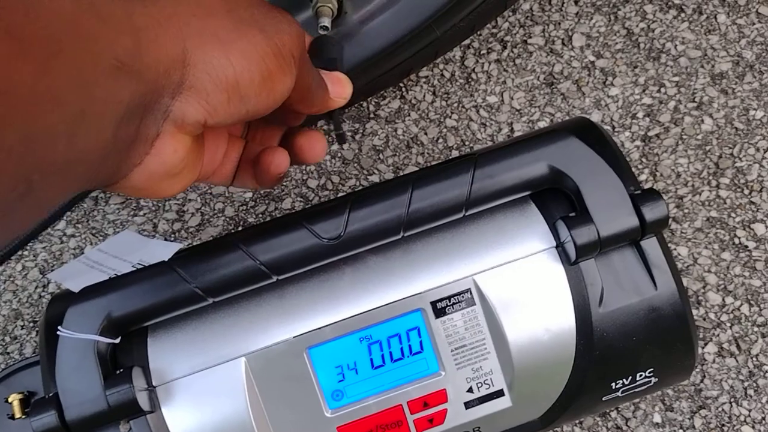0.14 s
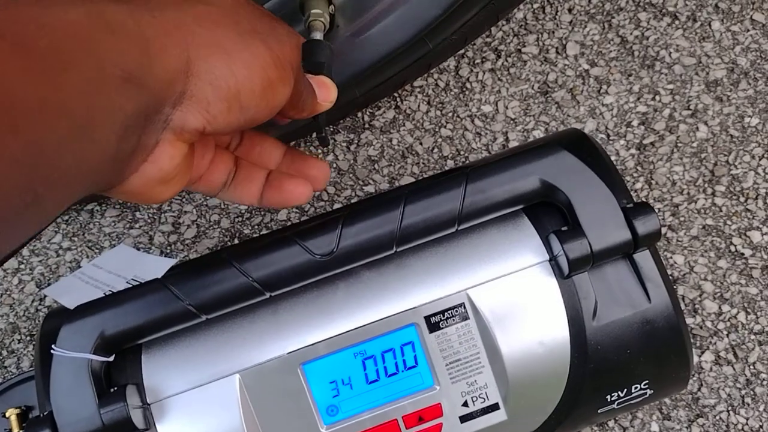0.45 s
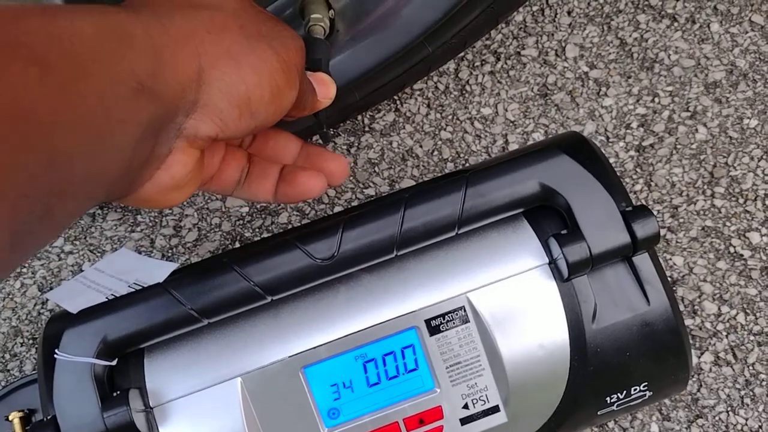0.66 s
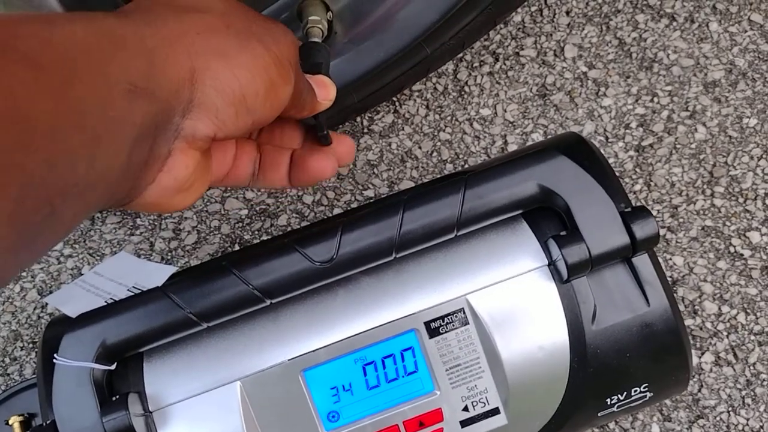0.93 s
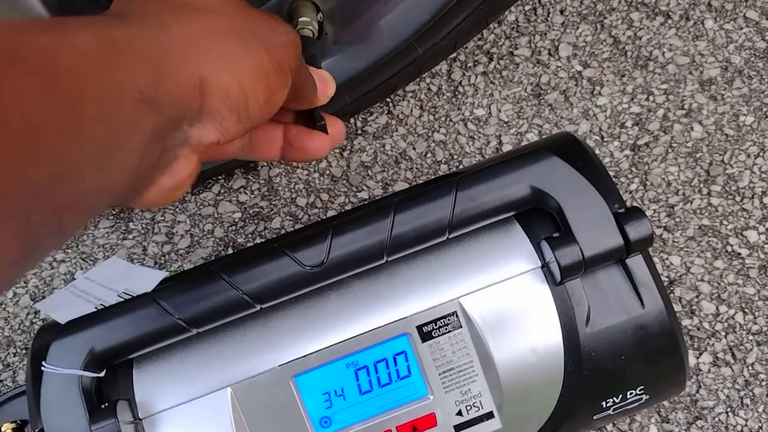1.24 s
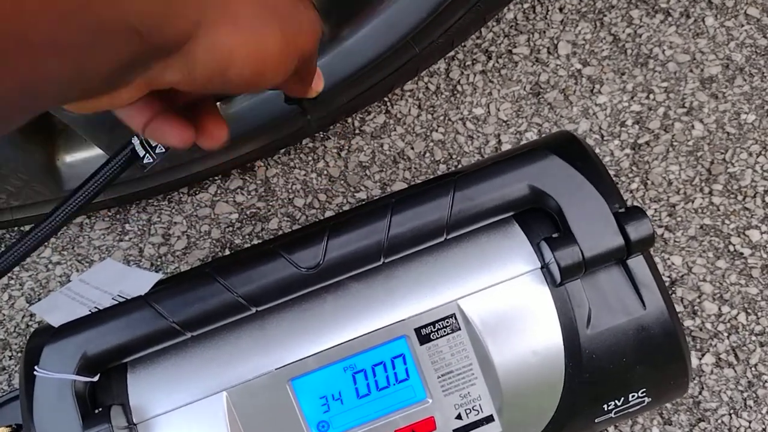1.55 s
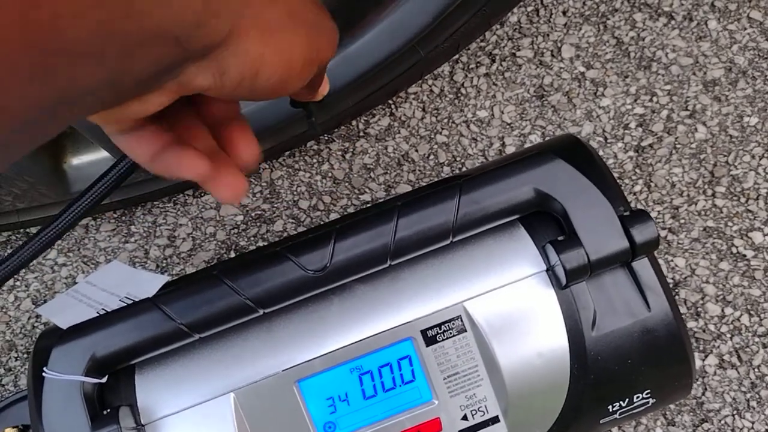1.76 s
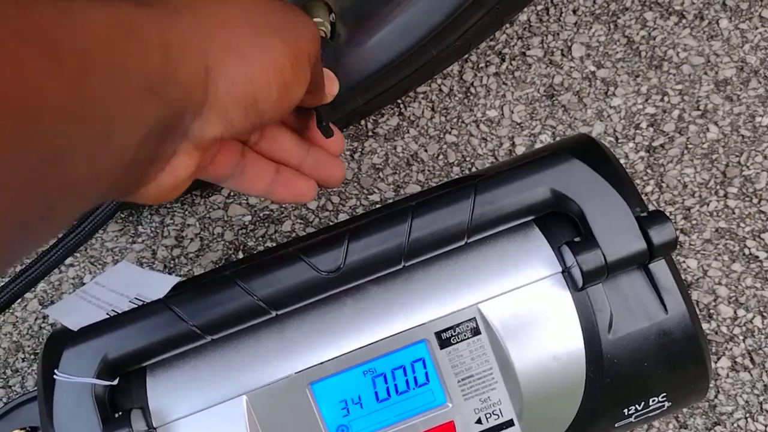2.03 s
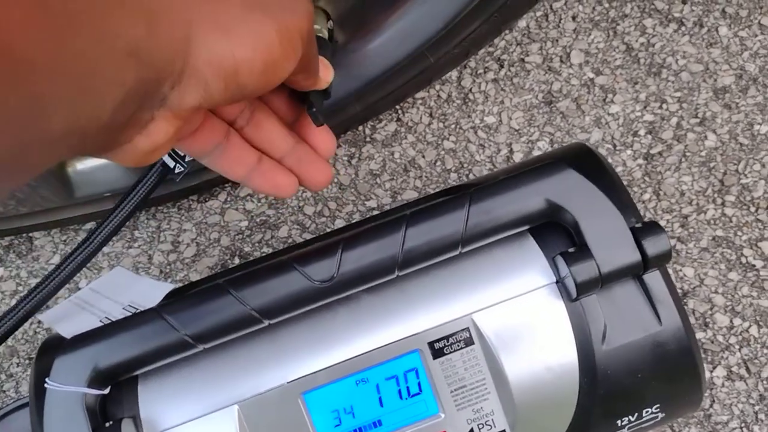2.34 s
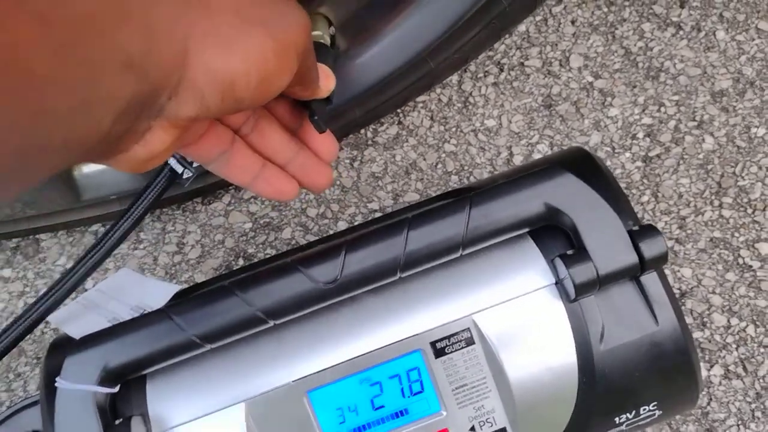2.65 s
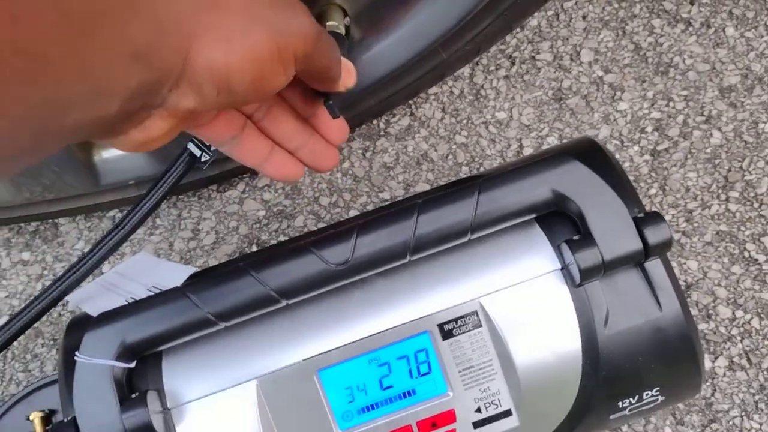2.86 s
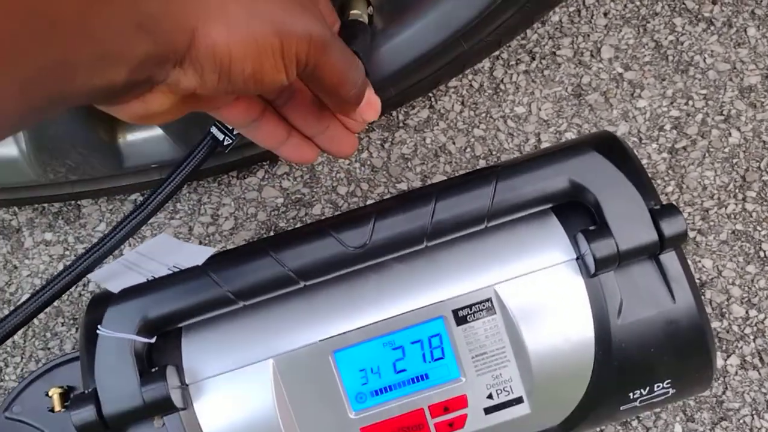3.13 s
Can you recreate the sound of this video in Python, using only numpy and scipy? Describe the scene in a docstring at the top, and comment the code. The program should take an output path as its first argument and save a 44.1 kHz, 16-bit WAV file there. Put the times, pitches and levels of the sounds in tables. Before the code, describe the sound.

A loud, bright air hiss escapes at a tire valve after about two seconds of low throbbing engine idle and soft mechanical rush, outdoors on pavement, close mono microphone; it continues to the end.

```python
"""Beside an idling eight-cylinder engine, at a tire valve, with a mono recorder close by.
Behind: faint wavering sines, a treble rustle in swells and the rush of the engine bay (both coloured noise),
and a throbbing exhaust hum made of uneven firing pulses sent through a pipe response.
In front, an air chuck is screwed onto the valve; the pin opens and air hisses out past the thread
as resonant noise. The recorder turns its gain down under the hiss."""
import sys
import numpy as np
from scipy import signal
from scipy.fft import rfft, irfft, next_fast_len
from scipy.io import wavfile
from scipy.ndimage import uniform_filter1d

SR = 44100
rng = np.random.default_rng(int(sys.argv[2]) if len(sys.argv) > 2 else 0)


def master_out(mix):
    """Clip the mix to full scale and print it as 16-bit PCM to the path in sys.argv[1]."""
    frames = np.transpose(np.atleast_2d(mix))
    ceiling = np.clip(frames, -1, 1)
    pcm = np.round(ceiling * 32767).astype(np.int16)
    wavfile.write(sys.argv[1], SR, pcm)


N = 145530  # samples


def amp(db):
    """Amplitude factor of a level in dB."""
    return 10 ** (np.asarray(db) / 20)


def rms_one(x):
    """Scale a signal to rms 1."""
    return x / np.sqrt(np.mean(x ** 2) + 1e-20)


def at_hz(points, hz):
    """Read a (hz, db) curve, straight over log frequency."""
    curve_hz, curve_db = np.transpose(points)
    return np.interp(np.log(hz), np.log(curve_hz), curve_db)


def drift(rate_hz):
    """Slow random wander of spread 1: white noise smoothed by two equal poles."""
    pole = np.exp(-80 * np.pi * rate_hz / SR)  # runs at one value per 40 samples
    noise = rng.standard_normal(N // 40 + 2002)
    slow = signal.lfilter([1], [1, -2 * pole, pole * pole], noise)[2000:]
    return np.interp(np.arange(N) / 40, np.arange(len(slow)), rms_one(slow))


def noise_bands(spectrum, peaks):
    """Noise coloured by a spectrum and resonances, rms 1, as overlapping third-octave (centre Hz, band)."""
    size = next_fast_len(N)
    hz = np.arange(size // 2 + 1) * SR / size + 1e-3
    db = at_hz(spectrum, hz)
    for peak_hz, width_hz, lift_db in peaks:
        db = db + lift_db * np.exp(-(1.5 * (hz - peak_hz) / width_hz) ** 2)
    shaped = rfft(rng.standard_normal(size)) * amp(db) * (hz > 20) * (hz < 9000)
    shaped = shaped / np.std(irfft(shaped, size))
    centres = 250 * 2 ** (np.arange(17) / 3)
    place = np.interp(np.log(hz), np.log(centres), np.arange(17))
    bands = []
    for k, centre in enumerate(centres):
        share = np.maximum(0, 1 - abs(place - k))  # neighbours crossfade and sum to one
        bands.append((centre, irfft(shaped * share, size)[:N]))
    return bands


# Faint steady tones behind everything: 45.6 Hz is an engine order (three times crank speed),
# the rest perhaps belt-driven parts: pitch_hz, mean level_db (rms)
WHINE_TONES = [(45.6, -60), (268.8, -60), (311.8, -61), (394.7, -65), (546, -66), (668.5, -65), (698, -66),
               (822, -61), (879, -65), (897.8, -59), (936.6, -66), (957, -68), (1013.5, -66), (2375, -67),
               (2873, -59), (3275, -68), (3515, -67)]
WHINE_WAVER_DB, WHINE_WANDER = 2.0, .0006  # spreads: level in dB, pitch as a fraction


def whines():
    """Thin sine tones, each wavering in level and pitch on its own."""
    total = np.zeros(N)
    for pitch_hz, level_db in WHINE_TONES:
        level = np.sqrt(2) * amp(level_db + WHINE_WAVER_DB * drift(2.44))
        start_phase = rng.uniform(0, 2 * np.pi)
        cycles = pitch_hz * np.cumsum(1 + WHINE_WANDER * drift(4.9)) / SR
        total += level * np.sin(start_phase + 2 * np.pi * cycles)
    return total


# Swells of a treble rustle, perhaps insects: time_s, level_db before the flicker
RUSTLE_LEVEL = [(0, -60), (.12, -51), (.2, -57.5), (.265, -50.5), (.28, -61), (.4, -58), (.5, -56),
                (.6, -63), (.7, -51.5), (.84, -56.5), (.87, -66), (.96, -54), (1.02, -55.5), (1.1, -57.5),
                (1.2, -65), (1.27, -57), (1.31, -60), (1.39, -51), (1.41, -62), (1.56, -62), (1.67, -50),
                (1.69, -61.5), (1.82, -60.5), (2.2, -63.5)]
# Colour of the rustle above its low-end floor: frequency_hz, relative level_db (per Hz)
RUSTLE_SPECTRUM = [(4400, -25.5), (5000, -7), (6300, -11), (7500, -12), (8000, -38)]
# Resonances in the rustle: frequency_hz, width_hz, lift_db
RUSTLE_PEAKS = [(5280, 220, 4.5), (5540, 170, 9.5), (5850, 40, 12), (7030, 460, 5.5)]
TREBLE_FLICKER_DB = 2.5


def treble_swells():
    """A faint narrow noise that repeatedly swells and falls, flickering as it goes."""
    level_db = np.interp(np.arange(N) / SR, *np.transpose(RUSTLE_LEVEL))
    level_db = level_db + TREBLE_FLICKER_DB * drift(25.0)
    bands = noise_bands([(3000, -61)] + RUSTLE_SPECTRUM, RUSTLE_PEAKS)
    return amp(level_db) * sum(band for _, band in bands)


# Rush of the engine bay: frequency_hz, relative level_db (per Hz)
BAY_SPECTRUM = [(30, -34.5), (60, -7.5), (150, -2), (300, -4), (450, -10.5), (950, -14), (1150, -16),
                (1700, -20.5), (2200, -13), (3600, -13.5), (4100, -23), (5400, -25.5), (6500, -26.5),
                (7600, -26), (8100, -50)]
# Resonances of the engine bay: frequency_hz, width_hz, lift_db
BAY_RESONANCES = [(535.5, 82, 5.5), (867, 260, 7.5), (1336, 49, 6), (2200, 120, 2.5), (2377, 94, 8.5),
                  (2510, 45, 5.5), (2590, 68, -0.5), (2897, 180, 12.5), (3266, 90, 4.5), (3526, 110, 5.5),
                  (5300, 460, 4.5)]
BAY_DB, BAY_PATCHY_DB = -42.5, 0.8  # level before patchiness and rise; spread of each band
RASP_HZ, RASP_RISE_DB_PER_S = 2880, 0.26  # bands within a quarter octave grow slowly


def engine_bay():
    """Resonant noise whose bands waver separately while a rasp near the middle treble grows."""
    t = np.arange(N) / SR
    total = np.zeros(N)
    for hz, band in noise_bands(BAY_SPECTRUM, BAY_RESONANCES):
        is_rasp = abs(np.log2(hz / RASP_HZ)) < 1 / 4
        rise_db = RASP_RISE_DB_PER_S * (t + 0.5) * is_rasp
        total += band * amp(BAY_PATCHY_DB * drift(5.9) + rise_db)
    return amp(BAY_DB) * total


# Cylinders in firing order: bank (0 or 1), mean strength_db
FIRING_ORDER = [(0, .9), (1, .1), (1, 1.9), (0, 2.0), (1, -3.1), (0, -1.4), (0, -.5), (1, .1)]
# Response of the exhaust to firings, before the top rolls off: frequency_hz, level_db
EXHAUST_RESPONSE = [(30, -53), (48, -57.5), (62, -36.5), (80, -27.5), (100, -26.5), (120, -28.5),
                    (140, -30.5), (160, -37.5), (185, -54.5), (220, -56.5), (260, -57.5)]
CYCLE_HZ, FIRST_FIRING_S, BANK_LEAD_S = 7.5913, .005, .0006  # a cycle is eight firings
FIRING_SPREAD_DB, EXHAUST_TOP_HZ = 1.0, 270  # no two firings are alike


def exhaust():
    """Evenly spaced firings of uneven strength, one bank a little early, through a minimum-phase exhaust."""
    # folding the cepstrum gives the response its minimum phase
    grid_hz = np.arange(513) * CYCLE_HZ / 2
    cepstrum = irfft(np.log(amp(at_hz(EXHAUST_RESPONSE, grid_hz + 1))))
    cepstrum[1:512] *= 2
    cepstrum[513:] = 0
    response = rfft(cepstrum)

    # firings start before the first sample so that the exhaust is already ringing
    count = np.arange(-32, int(8 * CYCLE_HZ * N / SR) + 1)
    bank, strength_db = np.transpose(FIRING_ORDER)[:, count % 8]
    strength_db = strength_db + FIRING_SPREAD_DB * rng.standard_normal(len(strength_db))
    firing_s = FIRST_FIRING_S + count / 8 / CYCLE_HZ - BANK_LEAD_S * bank
    pulses = np.zeros(next_fast_len(N + 2 * SR))
    firing_sample = np.round((firing_s + 1) * SR).astype(int)
    # equal 0 dB firings would give harmonics of peak 1
    pulses[firing_sample] = amp(strength_db) * SR / (16 * CYCLE_HZ)

    hz = np.arange(len(pulses) // 2 + 1) * SR / len(pulses)
    log_gain = np.interp(hz, grid_hz, response.real)
    phase = np.interp(hz, grid_hz, response.imag)
    top_rolloff = 1 / (1 + (hz / EXHAUST_TOP_HZ) ** 20)
    pipe = np.exp(log_gain + 1j * phase) * (hz > 20) * top_rolloff
    return irfft(rfft(pulses) * pipe, len(pulses))[SR:SR + N]


# Air escaping at the valve: time_s, level_db before tilt and recorder gain, brightness (dB per octave)
AIR_LEAK = [(2.215, -58, 9), (2.235, -49, 6), (2.254, -32, -3.5), (2.3, -25, -1.5), (2.326, -25.5, -1.5),
            (2.356, -25.5, 1.5), (2.395, -21.5, -1), (2.429, -22.5, -1), (2.469, -19, 0.5),
            (2.506, -19, 0.1), (2.53, -23, -0.5), (2.641, -22, 0.6), (2.699, -21.5, 2.5), (2.741, -23, 1.2),
            (2.801, -20.5, -0.5), (2.86, -22.5, 1.2), (2.97, -20.5, .6), (3.02, -21, -0.5),
            (3.081, -19.5, 0), (3.2, -20.5, -0.7), (3.3, -22, -1.9)]
# Colour of the air jet: frequency_hz, relative level_db (per Hz)
JET_SPECTRUM = [(400, -34.5), (800, -22), (1250, -26.5), (1700, -27.5), (2400, -14.5), (3800, -11.5),
                (5500, -7.5), (7700, -5), (8000, -21.5), (8200, -19), (8550, -43.5)]
# Resonances of the chuck: frequency_hz, width_hz, lift_db when loose, lift_db when screwed home
CHUCK_RESONANCES = [(1610, 130, 6, 8), (1890, 110, 2.5, 7), (2534, 170, 3, -7.5), (2916, 340, 2.5, 2),
                    (3495, 190, 7, 6.5), (3695, 220, -5.5, 1.5), (4250, 60, 8.5, 1), (4810, 610, 5, 2.5),
                    (5030, 340, -6, 2), (5545, 140, 6.5, -9), (5980, 210, -1.5, 7), (6690, 170, -11.5, 7),
                    (6960, 200, -5.5, 7.5), (7800, 170, 3, 3)]
# How far the chuck is screwed home: time_s, share (0-1)
CHUCK_SEATING = [(2.5, 0.09), (2.56, 0.27), (3.0, 0.66), (3.05, 0.96)]
JET_PATCHY_DB = 1


def leak():
    """Jet noise through the chuck, patchy as the thread turns; its resonances change as the chuck seats."""
    t = np.arange(N) / SR
    time_s, level_db, tilt = np.transpose(AIR_LEAK)
    level_db = np.interp(t, time_s, level_db, left=-120)
    tilt = np.interp(t, time_s, tilt)
    together = drift(10.0)  # patchiness shared by all bands
    seated = np.clip(np.interp(t, *np.transpose(CHUCK_SEATING)), 0, 1)
    resonances = np.array(CHUCK_RESONANCES)
    loose = noise_bands(JET_SPECTRUM, resonances[:, [0, 1, 2]])
    home = noise_bands(JET_SPECTRUM, resonances[:, [0, 1, 3]])
    total = np.zeros(N)
    for (hz, loose_band), (_, home_band) in zip(loose, home):
        band = np.sqrt(1 - seated) * loose_band + np.sqrt(seated) * home_band
        tilt_db = tilt * np.log2(max(hz, 1800) / 5500)  # tilts about 5500 Hz, flat below 1800 Hz
        patchy_db = JET_PATCHY_DB * (drift(2.3) + 0.17 * together)
        total += band * amp(tilt_db + patchy_db)
    return amp(level_db) * total


def scene():
    """All layers from the background to the air, the same on two channels."""
    mono = whines() + treble_swells() + engine_bay() + exhaust() + leak()
    return np.tile(mono, (2, 1))


GAIN_THRESHOLD_DB, GAIN_SLOPE = -35.5, .5  # slope: dB of cut per dB over the threshold
GAIN_TIME_S, GAIN_HEARS_HZ = 0.14, 300
CUTOFF_HZ = 8560


def record(dry):
    """Gain control listens above the bass and eases down when the level passes its threshold; the top is cut."""
    above_bass = signal.butter(2, GAIN_HEARS_HZ, "high", fs=SR, output="sos")
    heard = signal.sosfilt(above_bass, dry[0])
    level_db = 10 * np.log10(uniform_filter1d(heard ** 2, size=2048) + 1e-12)
    wanted_cut_db = GAIN_SLOPE * np.maximum(level_db - GAIN_THRESHOLD_DB, 0)
    pole = np.exp(-1 / (GAIN_TIME_S * SR))
    cut_db = signal.lfilter([1 - pole], [1, -pole], wanted_cut_db)
    top_cut = signal.ellip(14, .5, 75, CUTOFF_HZ, fs=SR, output="sos")
    return signal.sosfilt(top_cut, dry * amp(-cut_db))


dry = scene()
out = record(dry)
master_out(out)
```